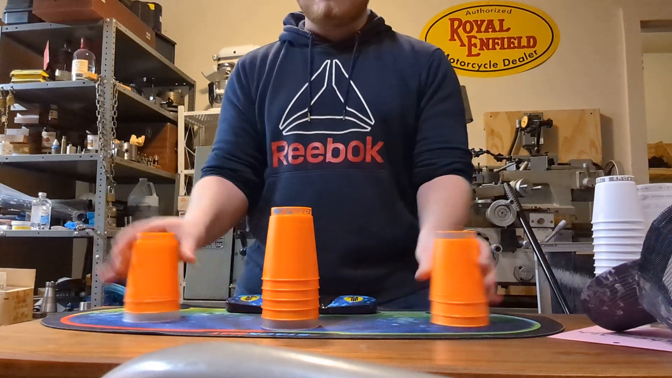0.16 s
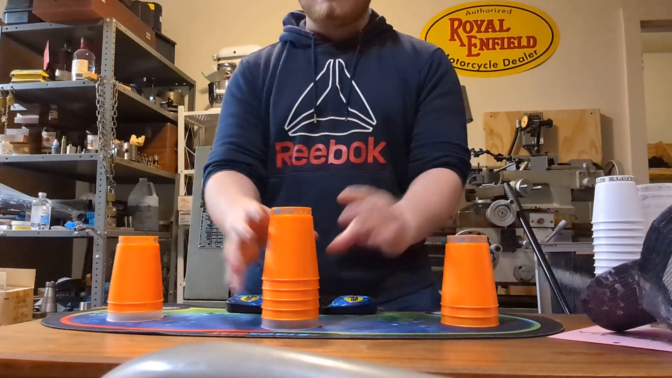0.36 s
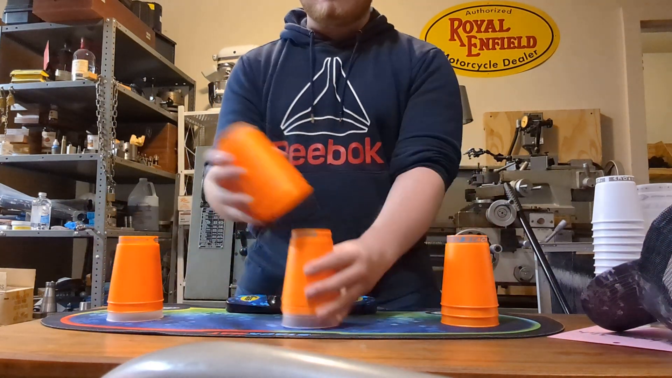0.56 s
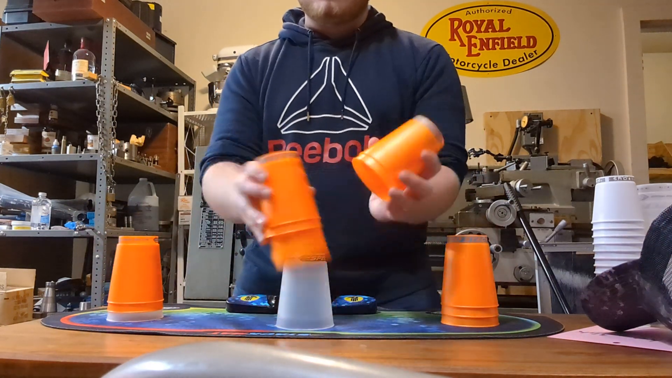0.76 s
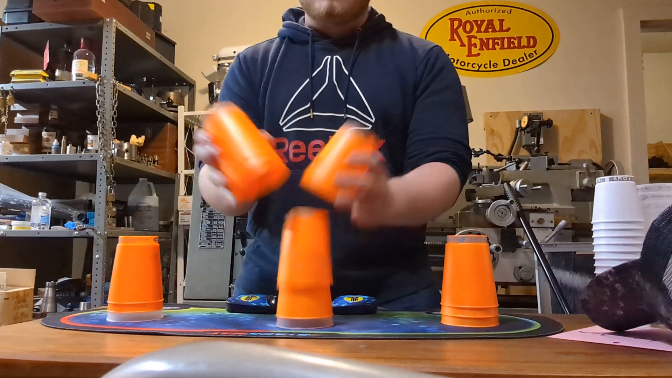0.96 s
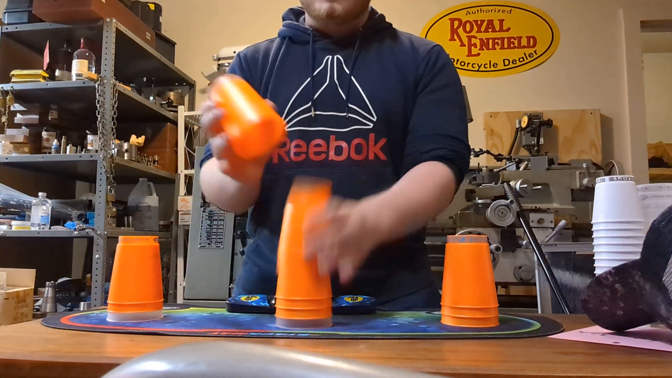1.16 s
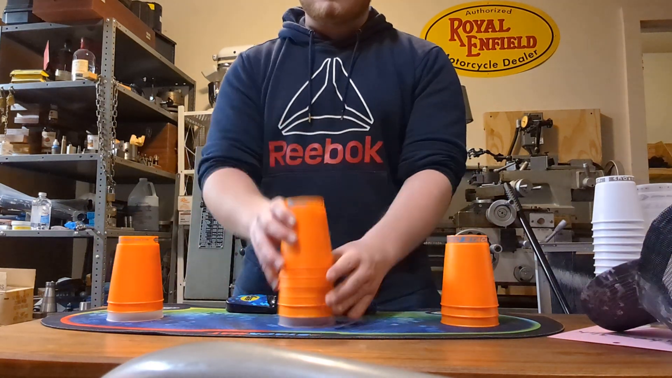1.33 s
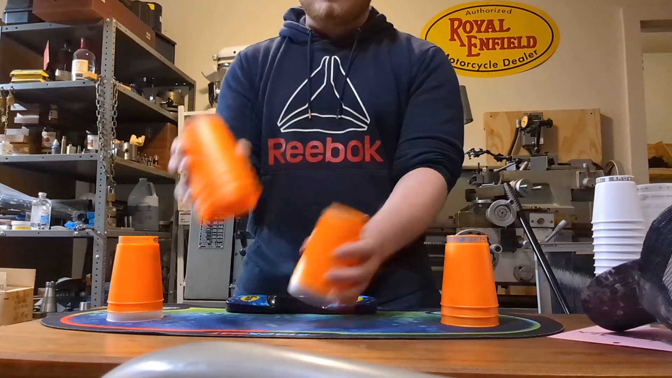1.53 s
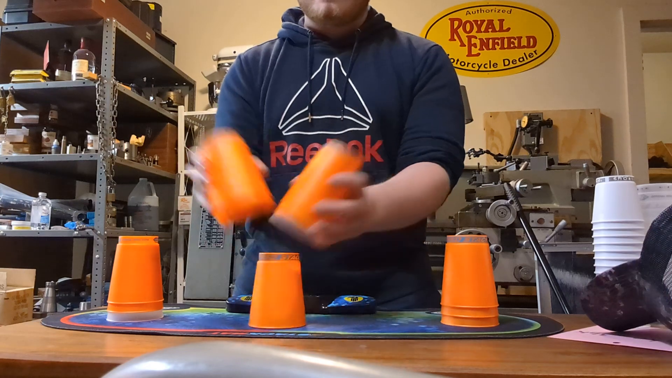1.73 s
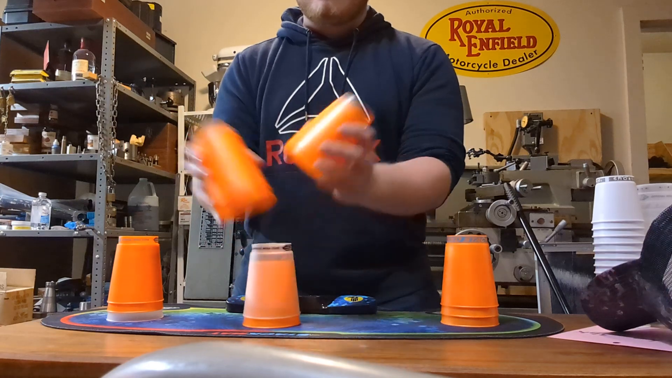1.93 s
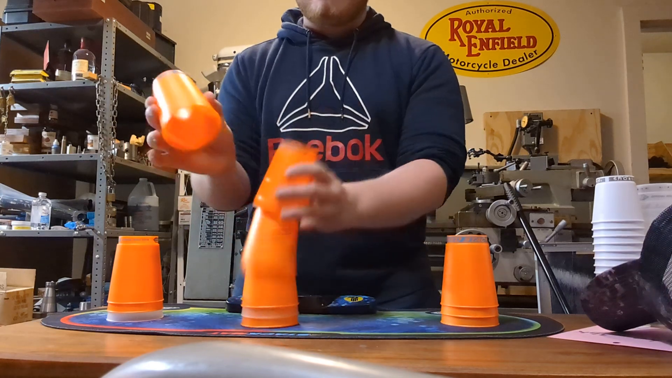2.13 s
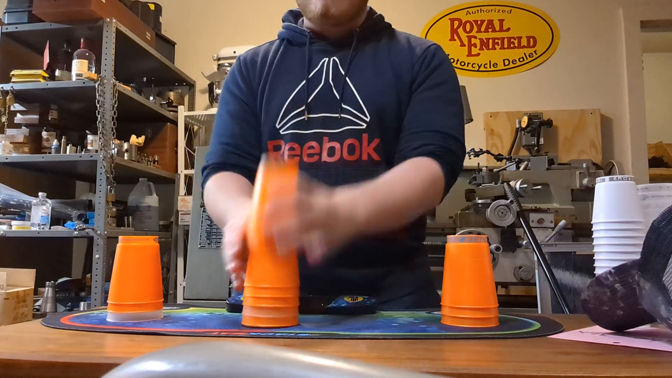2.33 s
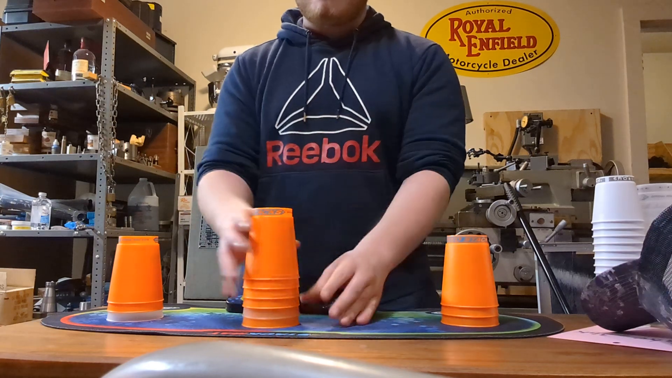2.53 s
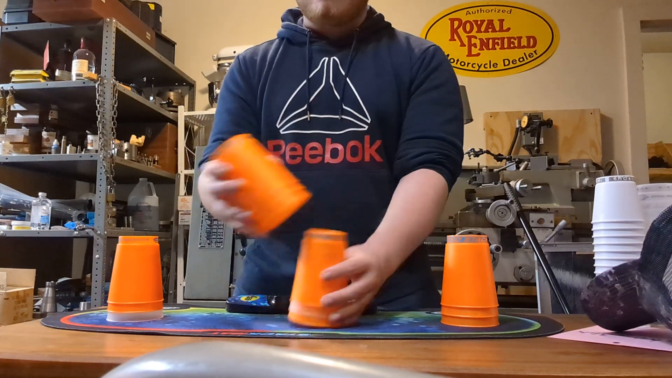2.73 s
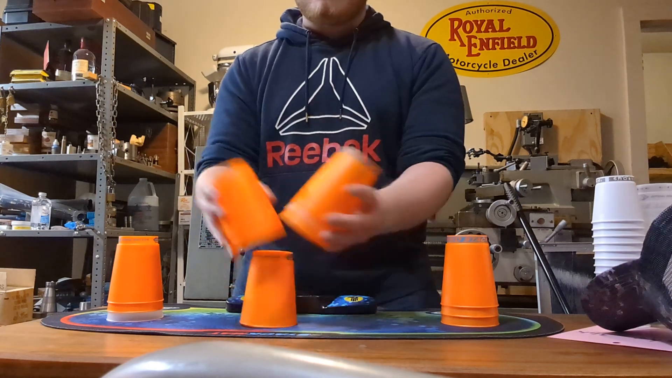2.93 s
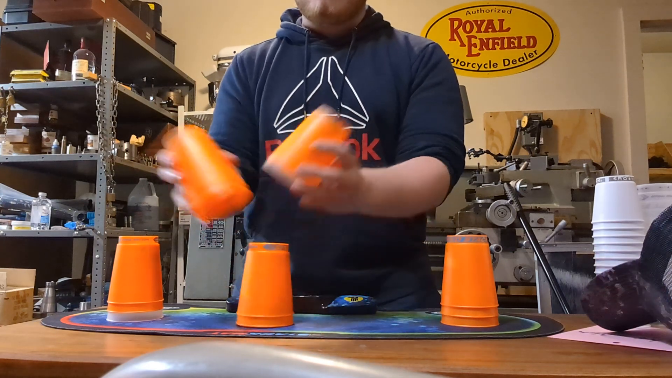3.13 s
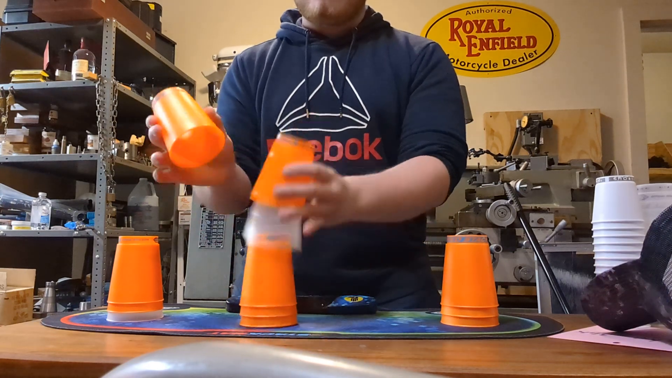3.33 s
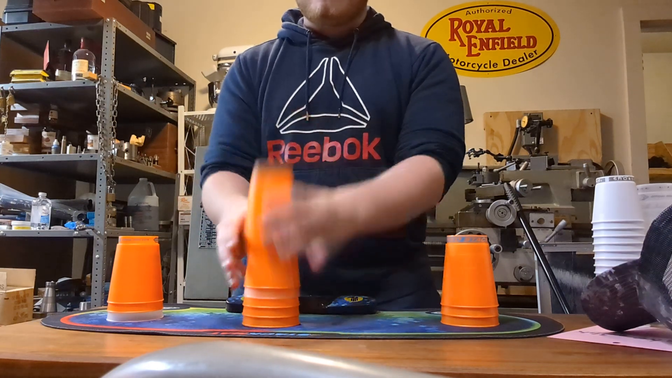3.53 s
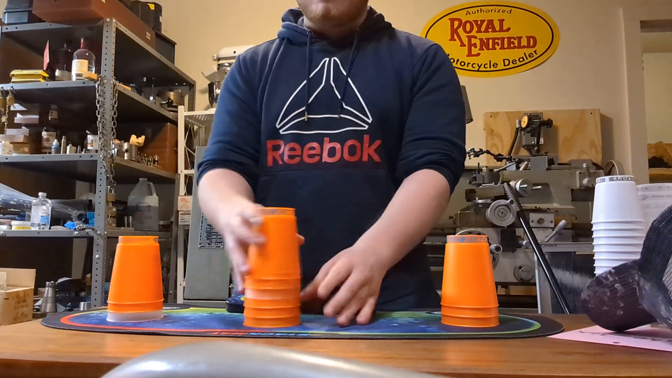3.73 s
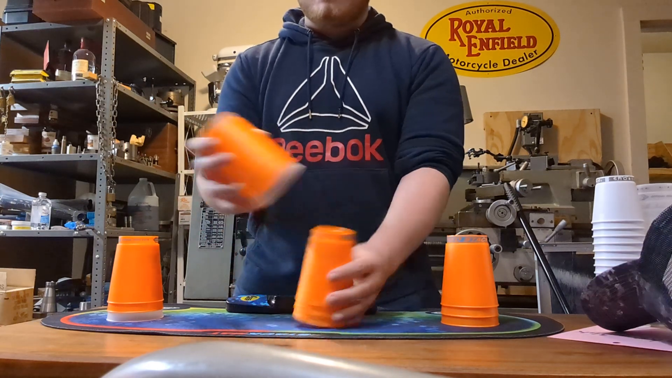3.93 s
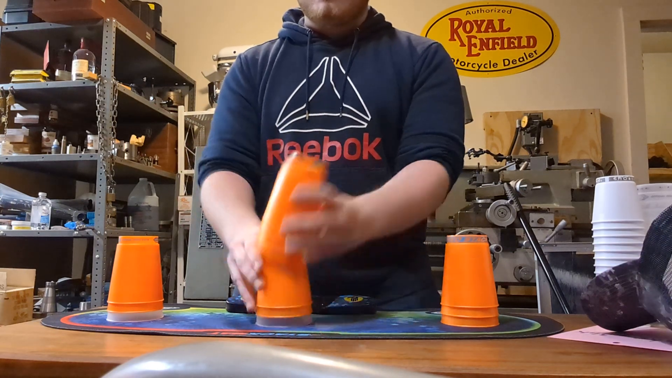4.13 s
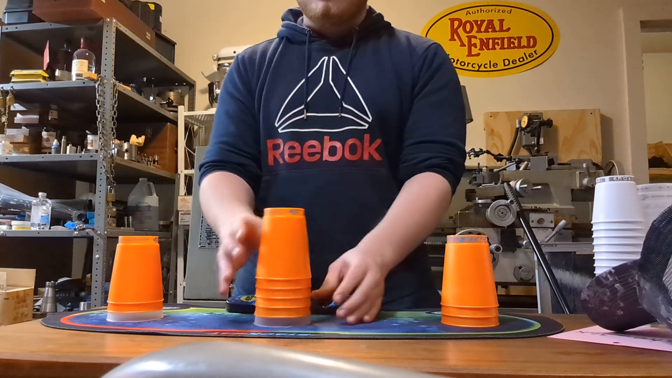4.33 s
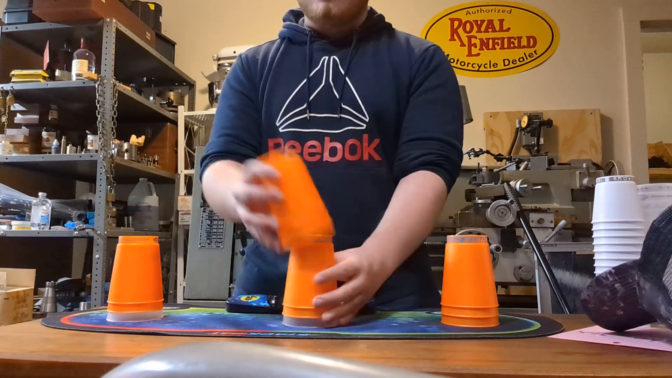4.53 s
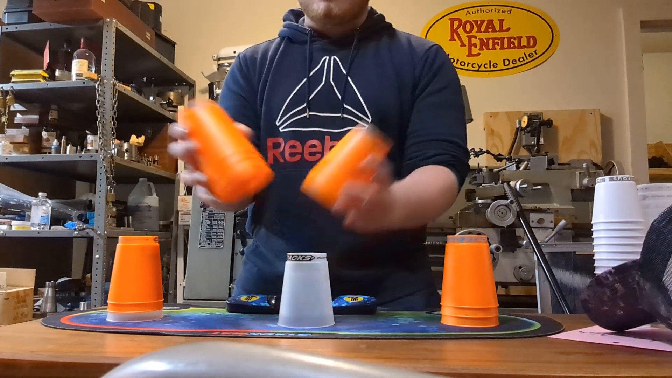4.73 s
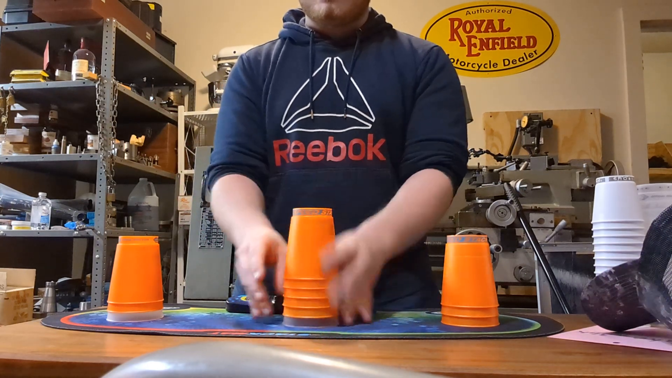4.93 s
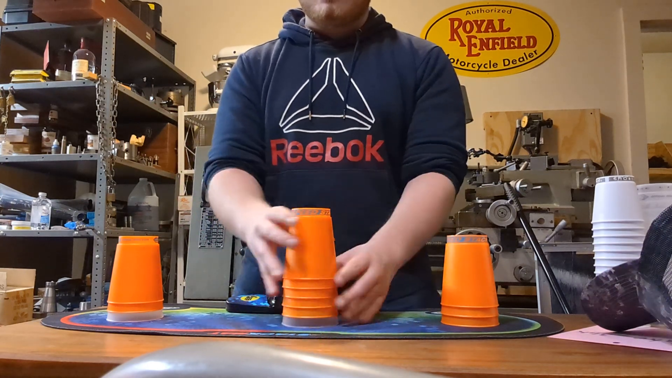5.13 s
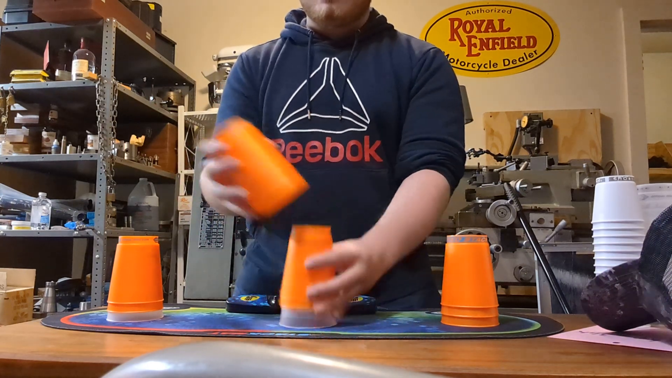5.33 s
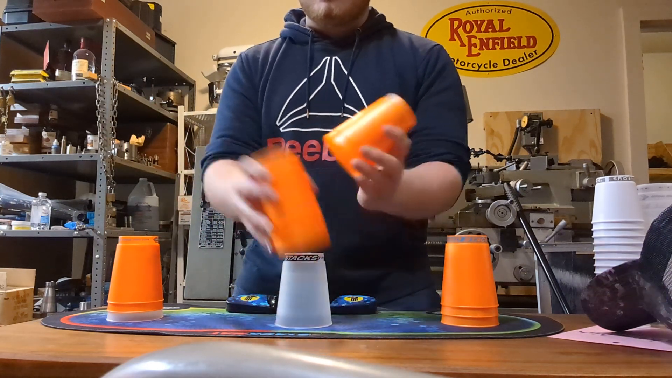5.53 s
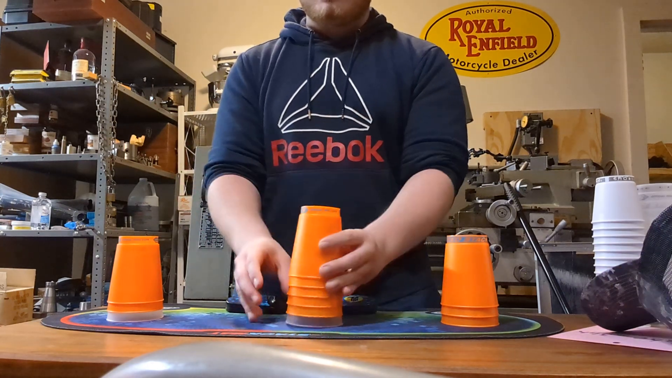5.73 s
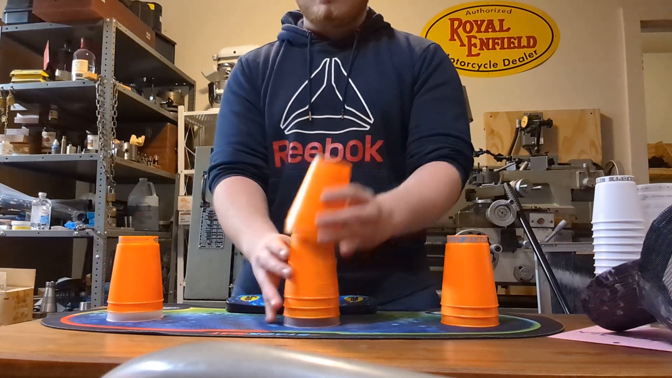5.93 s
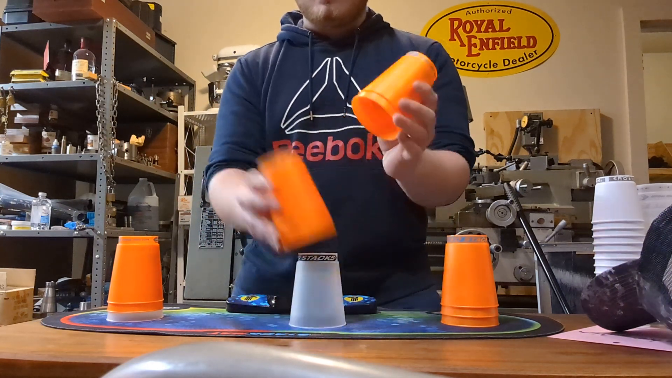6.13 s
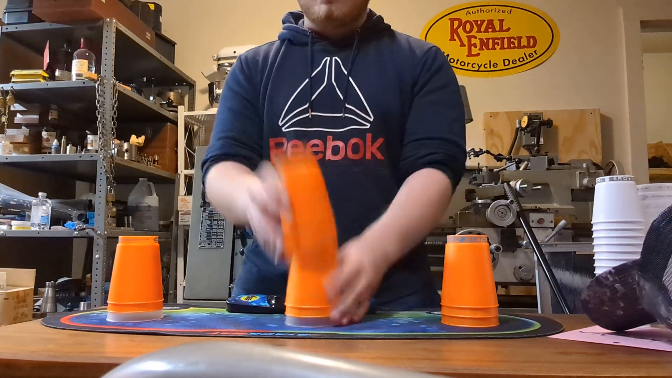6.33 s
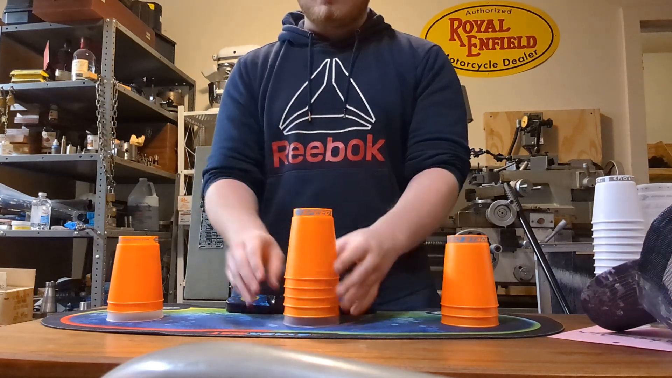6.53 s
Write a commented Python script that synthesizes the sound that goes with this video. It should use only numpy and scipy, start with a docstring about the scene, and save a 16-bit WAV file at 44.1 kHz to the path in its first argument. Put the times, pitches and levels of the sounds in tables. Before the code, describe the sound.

Thin plastic cups are stacked very fast on a mat over a wooden table. Quiet finger rustles and small taps come first, then a dense run of sharp rim cracks, hollow knocks, brief scrapes and dull thumps. Later, lighter handling alternates with sudden loud slams of the whole stack. Close stereo microphone in a lightly reverberant workshop, with faint hiss and low rumble.

```python
"""A faint rumble and hiss in a workshop, then a soft rustle of fingers on cups and a dull push on a mat.
Plastic cups are pulled apart and dropped back on a stack, on the mat over a wooden table: shaped noise makes
the rims crack and the walls slide, decaying sines ring the air inside the cups and boom the table top,
and modulated noise is the closed stack humming on after a slam.
The room answers with decaying noise; a pair of microphone ports hears it all."""
import sys
import numpy as np
from scipy import signal
from scipy.fft import rfft, irfft, next_fast_len
from scipy.io import wavfile
from scipy.ndimage import uniform_filter1d, map_coordinates

SR = 44100
rng = np.random.default_rng(int(sys.argv[2]) if len(sys.argv) > 2 else 0)


def wav_record(signal):
    """Record a signal, one row per channel, as 16-bit PCM in the file named by sys.argv[1]."""
    frames = np.transpose(np.atleast_2d(signal))
    bounded = np.clip(frames, -1, 1)
    # unit amplitude maps onto the largest positive 16-bit level
    quanta = np.round(bounded * 32767).astype(np.int16)
    wavfile.write(sys.argv[1], SR, quanta)


N = 293706


def amp(db):
    """Decibels to gain."""
    return 10 ** (np.asarray(db) / 20)


def unit(x):
    """Scaled to rms 1."""
    return x / np.sqrt(np.mean(x ** 2) + 1e-20)


def along(points, hz):
    """Interpolates (frequency [Hz], value) points on a log frequency axis."""
    f, v = np.transpose(points)
    return np.interp(np.log(hz + 1), np.log(f + 1), v)


def wobble(rate):
    """A smooth random curve, rate knots a second."""
    knots = rng.standard_normal(int(N * rate / SR) + 4)
    return map_coordinates(knots, [np.arange(N) * rate / SR])


def filtered(x, response):
    """x times a complex response of frequency in Hz."""
    n = x.shape[-1]
    m = next_fast_len(n + 8192)  # padding keeps the end from wrapping onto the start
    return irfft(rfft(x, m) * response(np.fft.rfftfreq(m, 1 / SR)), m)[..., :n]


def add(track, s, sound):
    """Mixes a sound in at s seconds."""
    part = track[..., round(s * SR):][..., :sound.shape[-1]]
    part += sound[..., :part.shape[-1]]


# How alike diffuse sound is at the two ports: (frequency [Hz], left-right correlation [1])
PORT_LIKENESS = [(150, .98), (350, 0.84), (2000, 0.074), (8000, 0.087)]


def diffuse(pair):
    """Two unrelated signals mixed to left and right, strongly alike in the bass only."""
    def mid_side_gains(hz):
        turn = np.arccos(np.clip(along(PORT_LIKENESS, hz), -1, 1)) / 2
        return np.array([np.cos(turn), np.sin(turn)])

    mid, side = filtered(pair, mid_side_gains)
    return np.array([mid + side, mid - side])


# Colour of the workshop's hiss: (frequency [Hz], relative density [dB per Hz])
HISS_COLOUR = [(35, -59), (60, 0), (213, -5.5), (777, -15.5), (4000, -18), (5700, -21), (6350, -10.5),
               (7000, -18), (9000, -23), (14700, -38)]


def air():
    """A faint hiss and a low rumble around 62 Hz; the level of both wavers."""
    colour = lambda hz: amp(along(HISS_COLOUR, hz))
    hiss = amp(2.5 * wobble(3)) * filtered(rng.standard_normal((2, N)), colour)
    rumble = filtered(rng.standard_normal((2, N)), lambda hz: 1 / (1 + ((hz - 62) / 16) ** 4))
    wander_db = 4.5
    rumble_gain = amp(-56.5 + wander_db * wobble(3.6))
    return diffuse(amp(-63.5) * unit(hiss) + rumble_gain * unit(rumble))


# Fingers shifting cups between the stacking: (from [s], to [s], level [dB])
FINGERS = [(0, 0.09, -58), (0.23, 0.694, -67), (4.45, 4.73, -68), (5.194, 5.583, -66.5),
           (6.062, 6.325, -73)]


def handling():
    """Soft, dull rustles and taps of fingers on the cups, coming in clumps."""
    clock = np.arange(N) / SR
    spans = sum(amp(db) * (clock >= a) * (clock < b) for a, b, db in FINGERS)
    busy = uniform_filter1d(spans, size=SR // 40)
    taps = (rng.random(N) < 60 / SR) * rng.standard_normal(N)  # 60 a second on average
    rustle = amp(5 * wobble(25)) * rng.standard_normal(N) + unit(taps)
    # two broad resonances, centred on 650 and 1500 Hz
    hollow = lambda f: sum(1j * f * c / (2 * c * c - 2 * f * f + 1j * f * c) for c in (650, 1500))
    return busy * unit(filtered(rustle, hollow))


BOOM_HZ = 209.2  # the board's strongest mode
BOOM_SWELL_S, BOOM_HOLD_S, BOOM_T60_S = 0.0044, 0.059, 0.52
# The lowest modes: light after a pause, heavier once the hands bear down, heaviest under the whole stack
PAUSE_S, FIRST_LOW_DB, LATER_LOW_DB, SLAM_LOW_DB = .25, -24, -14.5, -7
# A clack this loud is the whole stack closing; the board feels it for this long after
SLAM_DB, SLAM_S = -17.2, .04
TABLE_WANDER = 1.62  # radians; hands and cups keep disturbing the board
# Cups landing or pushed on the mat: (time [s], level [dB], boom level [dB])
MAT_THUMPS = [(0.004, -47.5, -57), (0.224, -38, -66), (0.492, -38, -59.5), (0.916, -28, -43),
              (1.086, -39, -38), (1.17, -34.5, -43), (1.37, -36.5, -62), (1.747, -24.5, -43),
              (1.941, -37.5, -43), (2.14, -34, -45), (2.348, -29.5, -45.5), (2.452, -34, -43),
              (2.959, -25.5, -48), (3.162, -35.5, -43), (3.479, -39.5, -40.5), (3.595, -31, -45.5),
              (3.655, -31, -50.5), (4.185, -23.5, -43), (4.286, -36, -52.5), (4.95, -37, -56),
              (4.983, -27, -53), (5.042, -32, -48.5), (5.457, -45.5, -62), (5.689, -26.5, -61),
              (5.706, -25, -43.5), (6.11, -42.5, -60.5), (6.392, -27.5, -45.5), (6.444, -25, -46),
              (6.475, -28, -54)]
# Modes of the wooden board: (frequency [Hz], relative level [dB], t60 [s])
BOARD_MODES = [(69.6, 6, 0.14), (139.4, 8, 0.22), (270.3, -7.5, 0.23), (353.5, -8, 0.22), (416.3, 4, 0.068),
               (522.5, -1.5, 0.064), (664, 1.5, 0.043), (969, 1, 0.027)]


def table():
    """The mat softens each push, so the board's modes swell in and ring at new strengths."""
    clock, t = np.arange(N) / SR, np.arange(SR // 3) / SR
    shaking, out = np.zeros(N), np.zeros(N)
    boom_fade = amp(-60 * np.maximum(t - BOOM_HOLD_S, 0) / BOOM_T60_S)
    boom = boom_fade * (1 - np.exp(-t / BOOM_SWELL_S))
    chance = rng.standard_normal((len(MAT_THUMPS), len(BOARD_MODES)))
    # only the modes above 230 Hz wander in phase
    drift = TABLE_WANDER * np.array([wobble(30) * (hz > 230) for hz, *_ in BOARD_MODES])
    slams = [s for s, db, *_ in RIM_CLACKS if db > SLAM_DB]
    pauses = np.diff(np.array(MAT_THUMPS)[:, 0], prepend=0)
    for (s, db, boom_db), pause, luck in zip(MAT_THUMPS, pauses, chance):
        lower_db = FIRST_LOW_DB if pause > PAUSE_S else LATER_LOW_DB
        if any(0 < s - slam < SLAM_S for slam in slams):
            lower_db = SLAM_LOW_DB
        bends = drift.take(round(s * SR) + np.arange(len(t)), axis=1, mode='clip')
        ring = np.zeros(len(t))
        for (hz, level, t60), g, bend in zip(BOARD_MODES, luck, bends):
            mode_db = level + 2.6 * g + lower_db * (hz < 170)
            ring += amp(mode_db - 60 * t / t60) * np.sin(2 * np.pi * hz * t + bend - bend[0])
        add(out, s, amp(db) * ring * (1 - np.exp(-t / 0.0053)))
        add(shaking, s, amp(boom_db) * boom)
    wander = wobble(11)  # radians
    return out + np.sqrt(2) * shaking * np.sin(2 * np.pi * BOOM_HZ * clock + wander)


# How long the workshop rings: (frequency [Hz], t60 [s])
ROOM_DECAY = [(150, 0.72), (900, 0.49), (8000, 0.39)]


def room(x, step=.1):
    """Reverberation dying faster in the treble; the cups move, so every step seconds gets a new tail."""
    out, hop = np.zeros((2, N)), int(step * SR)
    for start in range(0, N, hop):
        hz, t, z = signal.stft(rng.standard_normal((2, SR // 2)), SR, nperseg=256)
        fade = amp(-60 * t / along(ROOM_DECAY, hz)[:, None])
        tail = signal.istft(z * fade, SR, nperseg=256)[1]
        tail = tail / np.linalg.norm(tail[0])
        answer = signal.fftconvolve(x[None, start:start + hop], tail, axes=1)
        add(out, start / SR + 0.0053, answer)  # the room answers 5.3 ms late
    return diffuse(out)


DULL_HZ = 12500  # blows fade above this; rubbing walls stay brighter
# Colour of the cup wall, struck or rubbed: (frequency [Hz], relative density [dB per Hz])
WALL_COLOUR = [(240, -23), (400, -2.5), (885, -8), (1700, -9), (8190, -13), (15000, -21.5)]


def plastic(hz):
    """Colour of a blow on the cup wall."""
    return amp(along(WALL_COLOUR, hz)) / (1 + (hz / DULL_HZ) ** 2)


def cracks(events, colour):
    """The thin wall snaps at each (time [s], level [dB]), then the rims chatter briefly."""
    out, t = np.zeros((2, N)), np.arange(SR // 20) / SR
    noise = filtered(rng.standard_normal((len(events), 2, len(t))), colour)
    flutter = uniform_filter1d(rng.standard_normal((len(events), len(t))), size=SR // 250)
    for (s, db), pair, shake in zip(events, noise, flutter):
        hiss, scatter = unit(pair)
        wall = hiss + .5 * np.outer([1, -1], scatter)  # glints off the table differ between the ports
        snap = (1 - np.exp(-t / 0.0013)) * amp(db - 60 * t / 0.00637)
        # relative to the snap: chatter starts weaker, flutters and outlasts it
        chatter = amp(-22 + 5.04 * unit(shake) + 60 * t / 0.007394)
        add(out, s, wall * snap * (1 + chatter))
    return out


TICK_OCT, TICK_PEAK_DB = 0.22, 6  # width and height of a tick's bright band
# Rims glancing off each other, no hollow ring: (time [s], level [dB], brightest frequency [Hz])
RIM_TICKS = [(0.034, -37, 2600), (0.249, -26, 1600), (0.88, -17.5, 6000), (1.075, -16.5, 4400),
             (1.324, -7.5, 4570), (1.896, -19, 6100), (2.064, -11.5, 7100), (2.098, -20, 1340),
             (2.227, -14.5, 6300), (2.242, -26, 2900), (2.334, -15, 3620), (2.342, -8.5, 3630),
             (2.411, -11.5, 8100), (2.438, -16, 5000), (2.966, -14.5, 5200), (3.113, -24, 7140),
             (3.161, -12.5, 5600), (3.165, -18.5, 2870), (3.311, -19.5, 6030), (3.432, -15.5, 5170),
             (3.491, -19.5, 3170), (3.539, -14.5, 6500), (6.41, -12, 3170)]


def ticks():
    """Bare cracks of the rims with one bright band and no bass."""
    top = np.array(RIM_TICKS)[:, 2, None, None]

    def colour(hz):
        octaves = np.log2((hz + 1) / top)
        band = amp(TICK_PEAK_DB * np.exp(-.5 * (octaves / TICK_OCT) ** 2))
        return plastic(hz) * band * hz ** 2 / (hz ** 2 + top ** 2 / 10)

    return cracks([row[:2] for row in RIM_TICKS], colour)


TINT_DB = 3  # each contact has a colour of its own
NESTED = np.linspace(-1, 1, 5)  # relative detuning of the nested cups
# Cup on cup: (time [s], level [dB], hollow pitch [Hz], crack above the hollow ring [dB])
RIM_CLACKS = [(0.175, -50, 1465, -1), (0.238, -42.5, 1670, 0), (0.282, -38.5, 1655, 0),
              (0.352, -33, 1513, -8), (0.498, -38, 1256, -13), (0.548, -49.5, 1230, -5.5),
              (0.638, -47, 1740, -6.5), (0.923, -29, 874, 11), (1.03, -33.5, 1180, 6.5),
              (1.112, -33.5, 1030, 5), (1.161, -25.5, 2210, -10), (1.179, -22, 1670, -2.5),
              (1.191, -35, 1064, 2), (1.283, -26, 1487, 2), (1.372, -26, 1346, 4.5),
              (1.749, -32.5, 1096, -6), (1.811, -37, 1060, 8), (1.942, -32.5, 1984, 8),
              (2.141, -22.5, 1750, 4), (2.195, -38, 1850, 5.5), (2.269, -28, 1490, -1),
              (2.395, -29, 1584, 5.5), (2.45, -24, 1340, 5), (2.706, -42.5, 1190, -1),
              (2.862, -48.5, 1070, -15), (3.04, -28, 1094, -2), (3.183, -28, 1883, 2),
              (3.36, -27.5, 1605, 4), (3.416, -31, 1002, 7.5), (3.517, -19.5, 1767, -1),
              (3.597, -29.5, 1130, 6), (3.649, -30.5, 1630, 5.5), (3.889, -34.5, 1300, -5),
              (4.015, -41.5, 1080, 2.5), (4.187, -26, 1210, 1), (4.201, -18, 1792, -5.5),
              (4.21, -28, 1013, 0), (4.276, -15, 1407, -6), (4.67, -43.5, 1100, 2.5),
              (4.877, -43, 1176, -27), (4.936, -47.5, 1210, 6.5), (4.966, -27, 1000, 3.5),
              (5.011, -14, 1439, -4), (5.33, -41.5, 1220, -6.5), (5.368, -42.5, 1014, -20),
              (5.529, -49.5, 1045, -8.5), (5.688, -25.5, 1420, 2.5), (5.747, -15.5, 1505, -6.5),
              (6.085, -40, 1657, -12.5), (6.363, -45, 1100, -11), (6.392, -34, 1360, 6.5),
              (6.455, -15.5, 1463, -4.5)]


def clacks():
    """Cracks, each tinted its own way, and short rings of the air column, deeper for a longer stack."""
    rings, t = np.zeros(N), np.arange(SR // 10) / SR
    turn = rng.uniform(0, 2 * np.pi, (len(RIM_CLACKS), 1, 1))

    def colour(hz):
        tint = amp(TINT_DB * np.sin(2.508 * np.log(hz + 1) + turn))
        return plastic(hz) * tint * hz ** 2 / (hz ** 2 + 550 ** 2)

    spread = NESTED + .3 * rng.standard_normal((len(RIM_CLACKS), len(NESTED)))
    fade = amp(-7.5 - 60 * t / 0.028) + amp(-21.5 - 60 * t / 0.095)  # a quick and a slower decay
    for (s, db, hz, _), detune in zip(RIM_CLACKS, spread):
        pitches = hz * (1 + 0.057 * detune[:, None])  # nested cups ring at neighbouring pitches
        hollow = np.sin(2 * np.pi * pitches * t).sum(0)
        add(rings, s, hollow * (1 - np.exp(-t / 0.0012)) * amp(db) * fade)
    events = [(s, db + crack_db + 12.5) for s, db, _, crack_db in RIM_CLACKS]
    return cracks(events, colour), rings


SLIDE_S = .047
# Walls rubbing as cups nest or part: (time [s], level [dB])
WALL_SLIDES = [(0.939, -27), (0.997, -21.5), (1.135, -27), (1.9, -24), (1.96, -47), (2.077, -20),
               (2.204, -23), (2.459, -18.5), (3.313, -24.5), (3.652, -25), (4.967, -21), (5.698, -17),
               (6.406, -17)]


def slides():
    """Rubbing walls: rough noise studded with tiny rim ticks, its colour wandering as the cups nest."""
    rim_ticks = (rng.random(N) < 400 / SR) * rng.standard_normal(N)  # 400 a second on average
    hiss, scatter = amp(5.5 * wobble(90)) * rng.standard_normal((2, N))
    rubbing = hiss + 0.31 * np.outer([1, -1], scatter) + 0.28 * unit(rim_ticks)
    z = signal.stft(rubbing, nperseg=256)[2]
    # random gains smoothed over frequency, then time
    field = uniform_filter1d(rng.standard_normal(z.shape[1:]), 5, 0)
    field = uniform_filter1d(field, 8, 1)
    rough = unit(signal.istft(z * amp(2.5 * unit(field)), nperseg=256)[1])
    out = np.zeros((2, N))
    colour = lambda hz: amp(along(WALL_COLOUR, hz))
    shape = signal.windows.tukey(int(SLIDE_S * SR), .4)
    for s, db in WALL_SLIDES:
        stroke = shape * rough[:, round(s * SR):][:, :len(shape)]
        add(out, s, amp(db) * filtered(stroke, colour))
    return out


STACK_DB, STACK_T60_S = -29, .5  # the closed stack hums on; level relative to its clack
STACK_SPREAD = .08  # half-width of the hum as a share of its pitch
SINK, SINK_S = .12, .15  # its pitch starts this share higher and settles


def stack():
    """After a slam the nested cups keep rattling: rough noise near the hollow pitch, sinking and fading."""
    out, t = np.zeros(N), np.arange(SR // 2) / SR
    bent = t + SINK * SINK_S * (1 - np.exp(-t / SINK_S))
    for s, db, hz, _ in RIM_CLACKS:
        if db > SLAM_DB:
            narrow = lambda f: 1 / (1 + (f / (STACK_SPREAD * hz)) ** 2)
            a, b = unit(filtered(rng.standard_normal((2, len(t))), narrow))
            phase = 2 * np.pi * hz * bent
            rattle = a * np.sin(phase) + b * np.cos(phase)
            add(out, s, amp(db + STACK_DB - 60 * t / STACK_T60_S) * rattle)
    return out


# Colour difference between the ports: (frequency [Hz], left above right [dB])
PORT_COLOUR = [(1000, 1.5), (5000, 5), (9000, 13.5), (13000, -11)]
# Lag between the ports: (frequency [Hz], phase of left ahead of right [rad])
PORT_PHASE = [(300, 0), (3000, -.3), (8000, -2.3), (14000, -6.2)]


def scene():
    """Direct sound reaches the two ports with a small lag and a colour difference; room and air join it."""
    (walls, hollows), board = clacks(), table()
    cups = walls + ticks() + slides() + stack() + handling()
    side = np.array([[.5], [-.5]])  # half of each difference goes to each port

    def ports(hz):
        return amp(side * along(PORT_COLOUR, hz)) * np.exp(1j * side * along(PORT_PHASE, hz))

    direct = filtered(cups + hollows + board, ports)
    into_room = amp(-2.0) * cups[0] + amp(-4.0) * hollows + amp(-2.0) * board
    return direct + room(into_room) + air()


TOP_HZ = 16100  # band limit


def record(dry):
    """The microphone drops the deepest bass and rounds off the sharpest peaks; a steep band limit follows."""
    bass_cut = filtered(dry, lambda hz: (1j * hz / (1j * hz + 54)) ** 2)
    rounded = bass_cut / (1 + np.abs(bass_cut / .38) ** 4) ** (1 / 4)
    return filtered(rounded, lambda hz: 1 / (1 + (hz / TOP_HZ) ** 120))


dry = scene()
out = record(dry)
wav_record(out)
```